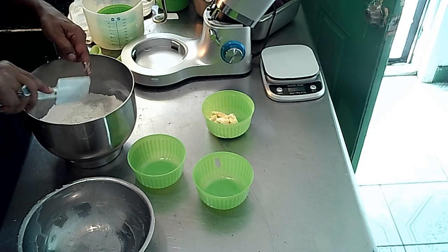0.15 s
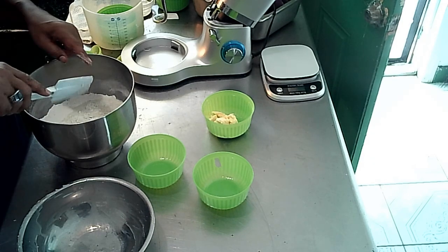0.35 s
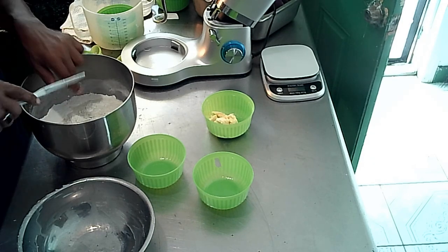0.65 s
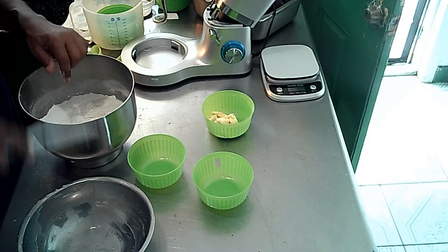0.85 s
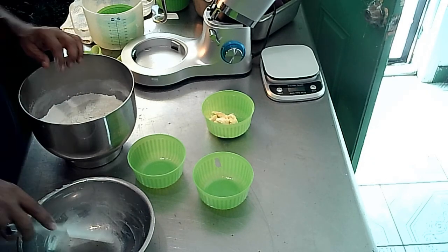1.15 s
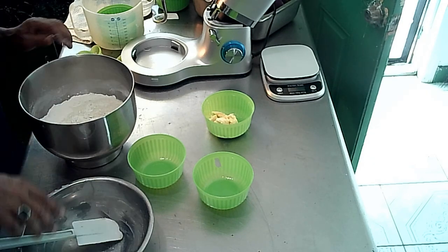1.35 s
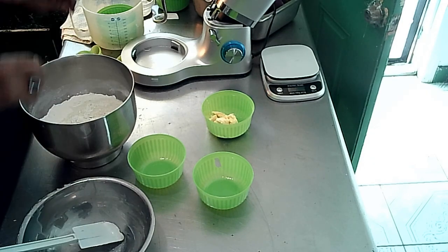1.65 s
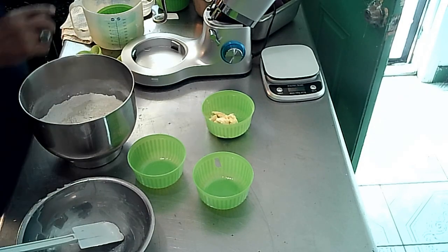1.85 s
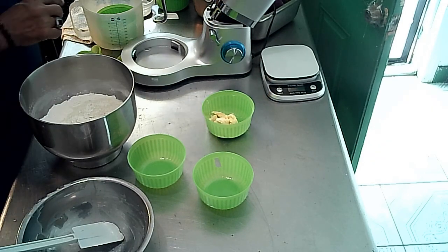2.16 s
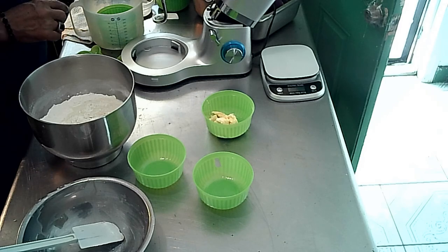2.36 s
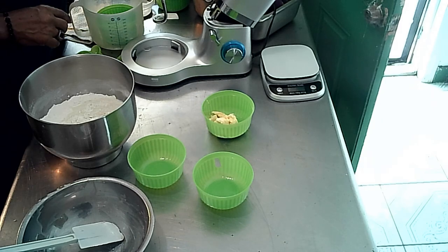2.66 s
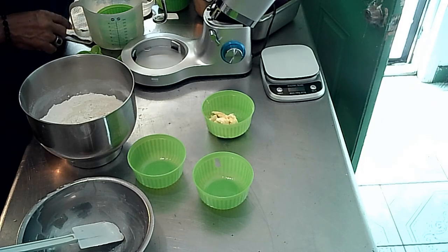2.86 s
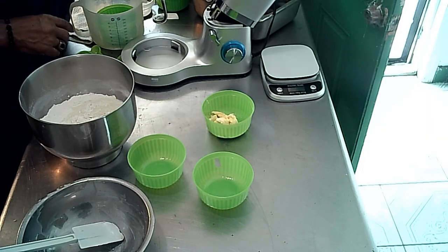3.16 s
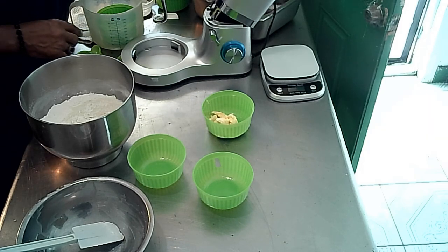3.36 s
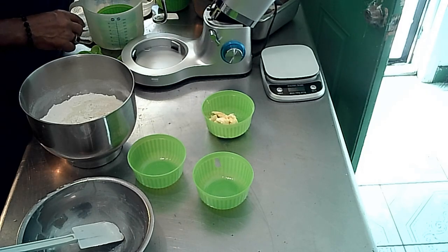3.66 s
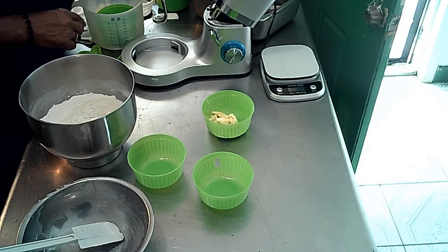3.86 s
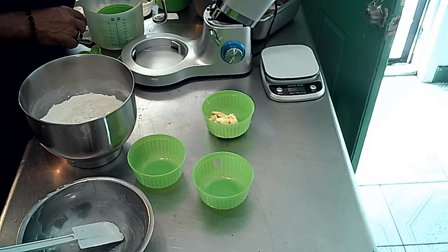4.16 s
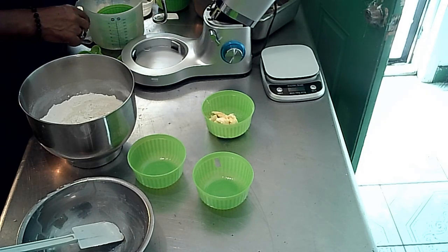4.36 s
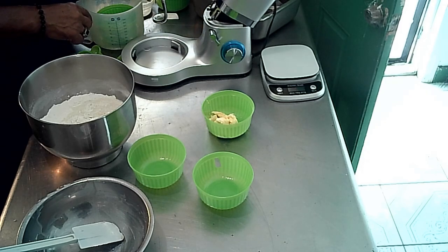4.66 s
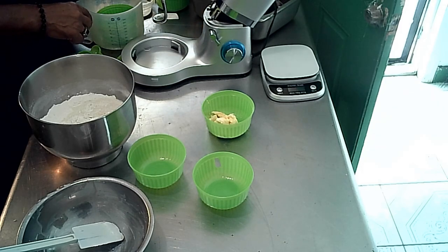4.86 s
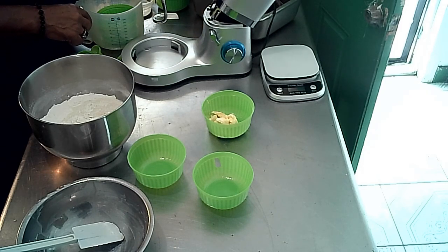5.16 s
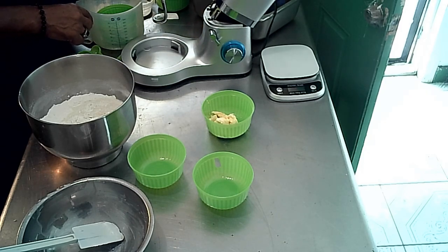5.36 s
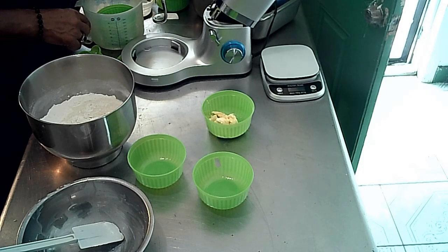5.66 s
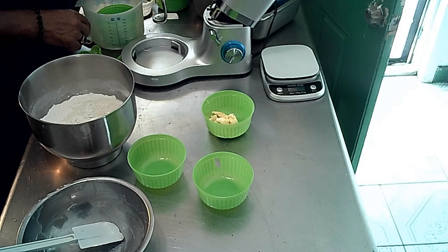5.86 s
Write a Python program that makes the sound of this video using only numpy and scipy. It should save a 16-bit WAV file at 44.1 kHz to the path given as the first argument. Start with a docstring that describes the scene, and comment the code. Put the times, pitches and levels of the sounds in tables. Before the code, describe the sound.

A plastic spatula drops into a steel bowl with one bright ringing clink, then utensils knock and scrape dully on a metal worktop in a hard-walled kitchen.

```python
"""First a hissing, crackling right microphone and a faint regular tick, then two light bumps of a hand.
A plastic spatula taps a steel mixing bowl and drops into it with one clink: struck modes and dense clatter.
Then utensils are knocked and dragged at the back of a steel worktop in a hard-walled kitchen: shaped
noise through resonances, rings and narrow tones. Only the left microphone works properly; the faulty
right one adds a low rustle and a creeping offset, and carries just a smeared trace of the kitchen."""
import sys
import numpy as np
from scipy import signal
from scipy.fft import rfft, irfft
from scipy.io import wavfile

SR = 44100
rng = np.random.default_rng(int(sys.argv[2]) if len(sys.argv) > 2 else 0)


def log_audio(samples):
    """Write samples as a 16-bit WAV file to the path given in sys.argv[1]."""
    # one column per channel
    frames = np.atleast_2d(samples).T
    # limit to full scale, then quantise
    limited = np.clip(frames, -1, 1)
    pcm = np.round(limited * 32767).astype(np.int16)
    wavfile.write(sys.argv[1], SR, pcm)


N = 265437
TIME = np.arange(N) / SR
RING_TIME = TIME[:SR * 3 // 5]


def from_db(db):
    """Turn decibels into an amplitude factor."""
    return 10 ** (np.asarray(db) / 20)


def rms_one(x):
    """Scale a signal to rms 1."""
    return x / np.sqrt(np.mean(x ** 2) + 1e-20)


def at_hz(points, hz):
    """Read a table on a log-frequency axis."""
    table_hz, values = np.array(points)[:, 0], np.array(points)[:, 1]
    return np.interp(np.log(hz + 1e-3), np.log(table_hz), values)


def add(track, s, sound):
    """Mix a sound into a track at a time in seconds."""
    start = round(s * SR)
    track[start:start + len(sound)] += sound[:N - start]


def butter(x, hz, kind, order=2):
    """Low- or high-pass a signal."""
    return signal.sosfilt(signal.butter(order, hz, kind, fs=SR, output="sos"), x)


def noise(spectrum, size=N):
    """Noise of a given colour, rms 1."""
    hz = np.fft.rfftfreq(size, 1 / SR)
    coloured = rfft(rng.standard_normal(size)) * from_db(at_hz(spectrum, hz))
    return rms_one(irfft(coloured, size))


def ring(modes, waver, rise):
    """Struck modes swell over their rise times; as reflections pile up, each partial wavers."""
    out, t = 0, RING_TIME
    knots = np.linspace(0, t[-1], num=32)
    for hz, db, t60 in modes:
        wander = np.interp(t, knots, rng.standard_normal(len(knots)))
        echoes = 1 + waver * np.minimum(t / .07, 1) * wander
        rise_s = rise if np.isscalar(rise) else at_hz(rise, hz)
        swell_in = np.minimum(t / rise_s, 1)
        out = out + from_db(db - 60 * t / t60) * swell_in * echoes * np.sin(2 * np.pi * hz * t)
    return out


# reverberation of the hard-walled kitchen: (frequency [Hz], t60 [s])
KITCHEN_T60 = [(200, 0.37), (660, 0.54), (1740, 0.52), (4590, 0.45), (8000, 0.39), (14000, 0.38)]


def dense_ring(spectrum, body_t60, room_db, size=20480):
    """Answer to one contact: crowded modes that die fast, then the room's tail, dying band by band."""
    t, hz = np.arange(size) / SR, np.fft.rfftfreq(size, 1 / SR)
    modes, out = rfft(noise(spectrum, size)), 0
    centres, t60s = np.transpose(KITCHEN_T60)
    for band, t60 in zip(np.eye(len(centres)), t60s):
        part = irfft(modes * at_hz(np.c_[centres, band], hz), size)
        body_decay = from_db(-60 * t / body_t60)
        room_decay = from_db(room_db - 60 * t / t60)
        out = out + part * np.hypot(body_decay, room_decay)
    return out


# spatula on the bowl: (time [s], bowl level [dB], blade level [dB], clatter level [dB])
BOWL_HITS = [(1.109, -57, -39, -42.5), (1.196, -66, -64, -56), (1.2297, -12.5, -42, -24)]
# ringing modes of the steel bowl: (frequency [Hz], level [dB], t60 [s])
BOWL_MODES = [(140, -25, .08), (297, -36, .9), (843, -33, .48), (1069, -25, .28), (1130, -26, .2),
              (1232, -24, .3), (1396, -16.5, .42), (1414, -21, .3), (1722, -29, .33), (1922, -23, .33),
              (2042, -24, .15), (2114, -24, .17), (2311, -13.5, .34), (3062, -29, .5), (3236, -24, .15),
              (3878, -14, .1), (3953, -1, .1), (3961, -14.5, .37), (4089, -15, .13), (4181, -19, .1),
              (4283, -18, .09), (4746, -21, .2), (4838, -21, .15), (4946, -26, .18), (5502, -31, .25),
              (7257, -33, .13), (9394, -28, .1)]
# low bowl modes radiate poorly upwards and build up through the room: (frequency [Hz], rise [s])
BOWL_RISE = [(140, .004), (300, .02), (1400, .035), (2300, .025), (3100, .002), (4000, .001)]
# modes of the plastic spatula: (frequency [Hz], level [dB], t60 [s])
BLADE_MODES = [(669, -13, 0.18), (1260, -12, 0.38), (1454, -2.5, 0.17), (1895, -12, 0.23),
               (1423, -2.5, 0.32), (1500, -2, 0.23), (1670, -6, 0.22), (1934, 7.5, 0.033), (1990, -4, 0.11),
               (2670, -14, 0.23), (3700, -1, 0.033), (5980, -6, 0.028), (8000, -36, 0.021)]
# colour of the dense clatter of blade and bowl: (frequency [Hz], relative level per Hz [dB])
CLATTER = [(200, -2.5), (600, -7.5), (1200, 2.5), (2000, 1), (2800, -8), (4500, -0.5), (6300, -12),
           (9500, -13.5), (12000, -26)]
CRACK_DB, CRACK_T60_S = 5.5, .01  # level relative to the clatter


def bowl(clatter_rise_s=0.008):
    """The soft blade lands first and hardly stirs the bowl; the hard handle then sets it ringing."""
    out, t = np.zeros(N), RING_TIME
    # the instant of contact is a crack of a few ms, centred in the treble
    crack_colour = [(800, -32), (2500, -22), (3500, -12), (4700, 0),
                    (6200, -13), (7600, -12), (9000, -21), (16000, -24)]
    for s, bowl_db, blade_db, clatter_db in BOWL_HITS:
        add(out, s, from_db(bowl_db) * ring(BOWL_MODES, waver=.5, rise=BOWL_RISE))
        add(out, s, from_db(blade_db) * ring(BLADE_MODES, waver=0.68, rise=0.00096))
        clatter = dense_ring(CLATTER, body_t60=.09, room_db=-11.5)
        clatter = clatter * np.minimum(t[:len(clatter)] / clatter_rise_s, 1)
        add(out, s, from_db(clatter_db) * butter(clatter, 11500, "low", order=4))
        crack_level = from_db(clatter_db + CRACK_DB - 60 * t / CRACK_T60_S)
        add(out, s + 0.0018, crack_level * noise(crack_colour, len(t)))
    return out


# colour of the utensils before weighting: (frequency [Hz], relative level per Hz [dB])
UTENSIL = [(150, -20), (330, -4.5), (600, -4), (1000, -0.5), (2000, 0.5), (3000, -2), (4000, -3),
           (5400, -3), (6800, -13), (9500, -15.5), (15000, -34)]
# resonances of the worktop and what stands on it: (frequency [Hz], width [Hz], level [dB])
WORKTOP = [(340, 18, -17), (485, 125, -1.5), (905, 36, 1.5), (1440, 3.3, 6.5), (1780, 13, -31),
           (1974, 69, -6), (2614, 22, -9.5), (3145, 75, -10), (4620, 99, -5.5), (5300, 34, -26)]


def utensil(thud_db, bright_db, body_t60, room_db):
    """A heavy contact adds bass, a hard one treble; the worktop's resonances colour both."""
    colour = []
    for hz, db in UTENSIL:
        bass = thud_db * at_hz([(450, 0.92), (1400, 0.085)], hz)
        treble = bright_db * at_hz([(2500, 0), (9000, 1)], hz)
        colour.append((hz, db + bass + treble))
    contact = dense_ring(colour, body_t60, room_db)
    out = contact
    for hz, width, db in WORKTOP:
        out = out + from_db(db) * signal.lfilter(*signal.iirpeak(hz, hz / width, SR), contact)
    return out


# utensils knocked at the back of the worktop: (time [s], strength [dB], treble share [dB])
KNOCKS = [(2.696, -38, -22), (2.9, -39.5, -24), (2.966, -33.5, -26), (3.032, -32.5, -39), (3.197, -37, -27),
          (3.292, -41.5, -39), (3.373, -33.5, -25), (4.414, -39.5, -21.5), (4.643, -45, -23),
          (5.18, -27.5, -24), (5.43, -42, -29.5), (5.859, -39, -15)]
# steel that rings when knocked: (frequency [Hz], relative level [dB], t60 [s])
STEEL_MODES = [(1367, -10.5, 0.2), (1840, -3, 0.11), (1904, 4.5, 0.1), (2242, 1, 0.26), (2690, -7, 0.52),
               (3070, -9, 0.048)]
# a middling knock: strength, treble share and bass [dB]; harder ones lose bass [dB per dB of strength]
USUAL_KNOCK_DB, USUAL_TREBLE_DB, USUAL_THUD_DB, THUD_LOSS = -37.5, -22.5, 7, 0.69
# every knock chatters once more, a little later and weaker
REBOUND_S, REBOUND_DB = .007, -7
# hard, bright contacts stir the steel more [dB per dB of strength, dB per dB of brightness]
RING_WITH_STRENGTH, RING_WITH_BRIGHTNESS = 0.27, 0.34


def knocks(level_db=-6.5, rise_s=0.0014, steel_db=-15.5, snap_db=-8.0, snap_t60=0.047):
    """Plastic knocks on steel: a dull body that rebounds once, a faint ring and a short bright snap."""
    out, t = np.zeros(N), RING_TIME
    for s, db, treble_db in KNOCKS:
        extra_db = db - USUAL_KNOCK_DB
        thud_db = USUAL_THUD_DB - THUD_LOSS * extra_db
        bright_db = treble_db - USUAL_TREBLE_DB
        for delay, contact_db in ((0, db), (REBOUND_S, db + REBOUND_DB)):
            body = utensil(thud_db, bright_db, body_t60=0.075, room_db=-5)
            onset = np.minimum(t[:len(body)] / rise_s, 1)
            add(out, s + delay, from_db(contact_db + level_db) * body * onset)
        stir_db = RING_WITH_STRENGTH * extra_db + RING_WITH_BRIGHTNESS * bright_db
        steel = ring(STEEL_MODES, waver=0.68, rise=0.0075)
        add(out, s, from_db(db + steel_db + stir_db) * steel)
        snap_level = from_db(db + level_db + bright_db + snap_db - 60 * t / snap_t60)
        add(out, s, snap_level * butter(rng.standard_normal(len(t)), 5500, "high"))
    return out


# utensils dragged: (time [s], length [s], level [dB], brightness [dB])
SCRAPES = [(2.672, 0.066, -52, -7), (2.981, .087, -40, -10), (3.025, 0.074, -37, -9.5),
           (3.863, 0.11, -57.5, -9), (3.975, 0.09, -43.5, -3.5), (4.79, 0.038, -47, 5.5),
           (4.811, 0.072, -39.5, 1.5), (5.84, 0.076, -43, -2)]
SCRAPE_THUD_DB = 4  # bass of a drag of middling brightness


def scrapes(slips_per_s=550, thud_per_dullness=0.45):
    """A drag is a run of small uneven slips, each ringing like a tiny knock; dull drags are heavy ones."""
    out = np.zeros(N)
    for s, length, db, bright_db in SCRAPES:
        n = round(length * SR)
        slipping = rng.random(n) < slips_per_s / SR
        slips = slipping * rng.standard_normal(n) * signal.windows.tukey(n, .5)
        thud_db = SCRAPE_THUD_DB - thud_per_dullness * bright_db
        sound = signal.fftconvolve(slips, utensil(thud_db, bright_db, body_t60=0.056, room_db=-8.0))
        # the level holds for the second half of the drag
        add(out, s, from_db(db) * sound / np.std(sound[n // 2:n]))
    return out


# light bumps of a hand: (time [s], level [dB])
BUMPS = [(.665, -54), (.729, -48.5)]
# what the hand bumps: (frequency [Hz], relative level [dB], t60 [s])
BUMP_MODES = [(577, 0.5, 0.17), (646, 0, 0.059)]
# heavier things set down: (time [s], level [dB])
THUDS = [(3.032, -33), (4.843, -61), (5.867, -42)]
# boom of the worktop under them: (frequency [Hz], relative level [dB], t60 [s])
THUD_MODES = [(376, 0, 0.22), (508, -0.5, 0.087), (746, -7, 0.31), (808, -9, 0.26), (912, -21, 0.68)]
# light clinks of one pitch each: (time [s], frequency [Hz], level [dB], t60 [s])
CLINKS = [(2.967, 2204, -41, 0.25), (3.196, 1732, -38, 0.11), (3.199, 2850, -39.5, 0.071),
          (3.373, 2740, -45, 0.12), (4.05, 2297, -53.5, 0.3)]


def bumps():
    """Hands bump things lightly; heavier things make the worktop boom, small hard ones clink."""
    out = np.zeros(N)
    for s, db in BUMPS:
        add(out, s, from_db(db) * ring(BUMP_MODES, waver=0.32, rise=0.0028))
    for s, db in THUDS:
        add(out, s, from_db(db) * ring(THUD_MODES, waver=0.77, rise=0.0022))
    for s, hz, db, t60 in CLINKS:
        add(out, s, ring([(hz, db, t60)], waver=0.97, rise=0.003))
    return out


# short squeaks of sliding plastic: (time [s], length [s], frequency [Hz], level [dB])
SQUEAKS = [(3.0, .06, 8000, -61), (4.9, 0.016, 5730, -47), (5.845, 0.044, 5500, -49)]
# something hollow rings softly: (time [s], length [s], frequency [Hz], level [dB])
HOLLOW_RINGS = [(4.14, .12, 974, -55), (4.27, .16, 974, -62), (5.41, .08, 974, -56)]


def tones(rows, width_hz, t60):
    """Narrow, unsteady tones that swell for half their length while rubbed and then ring out."""
    out, t = np.zeros(N), TIME[:SR]
    for s, length, hz, db in rows:
        wander = width_hz * rms_one(butter(rng.standard_normal(SR), 120, "low"))
        decay = from_db(-60 * np.maximum(t - length / 2, 0) / t60)
        envelope = np.minimum(2 * t / length, 1) * decay
        tone = np.sqrt(2) * np.sin(2 * np.pi * np.cumsum(hz + wander) / SR)
        add(out, s, from_db(db) * envelope * tone)
    return out


# crackle of a bad contact:
# (time [s], length [s], rate [pulses per s], pulse width [s], left level [dB], right level [dB])
CRACKLES = [(0.109, 0.0044, 2500, 0.000061, -35.5, -33), (.127, 0.0016, 700, 0.00017, -27.5, -24.5),
            (0.1299, 0.0013, 1700, 0.00021, -30.5, -25), (5.185, 0.0029, 1000, 0.000098, -25.5, -26)]


def crackle():
    """The bad contact adds tiny downward square pulses, on both channels at once."""
    out = np.zeros((2, N))
    for s, length, per_s, width, *sides_db in CRACKLES:
        count = max(round(length * per_s), 1)
        delays = (np.arange(count) + rng.uniform(0, 0.88, count)) * length / count
        pulse = np.clip(width * SR - np.arange(SR // 1000), 0, 1)
        for delay in delays:
            for side, db in zip(out, sides_db):
                add(side, s + delay, -from_db(db) * pulse)
    return out


# the faulty input swells once [s]
SWELL_S = 2.23


def swell(width_s):
    """The one slow rise and fall of the faulty input, 0-1."""
    return np.exp(-((TIME - SWELL_S) / width_s) ** 2)


# colour of the low rustle: (frequency [Hz], relative level per Hz [dB])
RUMBLE = [(30, 12.5), (90, -5), (180, -13.5), (400, -11.5), (1200, -20.5), (5000, -30), (16000, -45)]
# the rustle grows with the swell: level at rest [dB], rise at the top [dB], width [s]
RUMBLE_REST_DB, RUMBLE_SWELL_DB, RUMBLE_SPREAD_S = -63, 14.5, 1.07
# and flares at a hit on the bowl: level relative to the hit [dB], t60 [s]
JOLT_DB, JOLT_T60_S = -42, 0.18


def rustle():
    """Low rustle in the right microphone: it follows the swell and flares at each hit on the bowl."""
    level = from_db(RUMBLE_REST_DB + RUMBLE_SWELL_DB * swell(RUMBLE_SPREAD_S))
    for s, bowl_db, *_ in BOWL_HITS:
        add(level, s, from_db(bowl_db + JOLT_DB - 60 * RING_TIME / JOLT_T60_S))
    return level * noise(RUMBLE)


# faint electrical ticks, four a second
FIRST_TICK_S, TICK_GAP_S = .235, .25
# step size before filtering: at time zero [dB], random spread [dB], fade [dB per s]
TICK_DB, TICK_SPREAD_DB, TICK_FADE_DB_PER_S = -32.5, 1.5, 1


def ticks(decay_s=0.00064):
    """Each tick is a small step that leaks away; the steps go down and up in turn."""
    out, t = np.zeros(N), TIME[:SR // 50]
    for k, s in enumerate(np.arange(FIRST_TICK_S, TIME[-1], TICK_GAP_S)):
        sign = -(-1) ** k
        db = TICK_DB - TICK_FADE_DB_PER_S * s + TICK_SPREAD_DB * rng.standard_normal()
        add(out, s, sign * from_db(db) * np.exp(-t / decay_s))
    return butter(butter(out, 1100, "low"), 184, "high", order=1)


# steady air of the kitchen: (frequency [Hz], relative level per Hz [dB])
ROOM_AIR = [(30, 8.5), (80, 7.5), (150, -5.5), (300, 2), (600, -3), (1200, -10), (3000, -18.5), (8000, -31),
            (16000, -38)]
# hiss of either channel: (frequency [Hz], relative level per Hz [dB])
HISS = [(30, 17.5), (80, -2.5), (160, -4), (350, 7.5), (1000, 3), (3000, -3), (8000, -9), (16000, -18.5)]


def scene():
    """The left microphone hears the kitchen; the right gets only a faint, smeared trace of it."""
    sounds = bowl() + knocks() + scrapes() + bumps()
    sounds = sounds + tones(SQUEAKS, width_hz=62, t60=0.1)
    sounds = sounds + tones(HOLLOW_RINGS, width_hz=15, t60=0.35)
    left = sounds + from_db(-59.5) * noise(ROOM_AIR) + from_db(-68.0) * noise(HISS) + ticks()
    smear_colour = [(200, 0), (1500, 13), (4000, 4), (12000, 29)]
    smear = dense_ring(smear_colour, body_t60=.02, room_db=2)
    trace = signal.fftconvolve(sounds, smear / np.linalg.norm(smear))[:N]
    right = from_db(-15.5) * trace + from_db(-64.5) * noise(HISS) + rustle()
    shared_noise = from_db(-66.5) * noise([(100, 1.0), (16000, -10)])  # the same on both sides
    return np.array([left, right]) + shared_noise + crackle()


CUTOFF_HZ = 15900
# zero levels are fractions of full scale; the faulty one swells once, then sinks to a new rest
LEFT_OFFSET, SWELL_WIDTH_S, SWELL_HEIGHT = .0645, .56, .3
SINK_S, SINK_WIDTH_S, OFFSET_BEFORE, OFFSET_AFTER = 3.65, .65, .118, -.09


def record(dry):
    """The top is cut steeply; both channels sit off zero, the faulty one on a slowly creeping offset."""
    sunk = (1 + np.tanh((TIME - SINK_S) / SINK_WIDTH_S)) / 2
    rest = OFFSET_BEFORE + (OFFSET_AFTER - OFFSET_BEFORE) * sunk
    creep = rest + SWELL_HEIGHT * swell(SWELL_WIDTH_S)
    top_cut = signal.ellip(10, .1, 80, CUTOFF_HZ, fs=SR, output="sos")
    return signal.sosfilt(top_cut, dry) + np.array([np.full(N, LEFT_OFFSET), creep])


dry = scene()
out = record(dry)
log_audio(out)
```